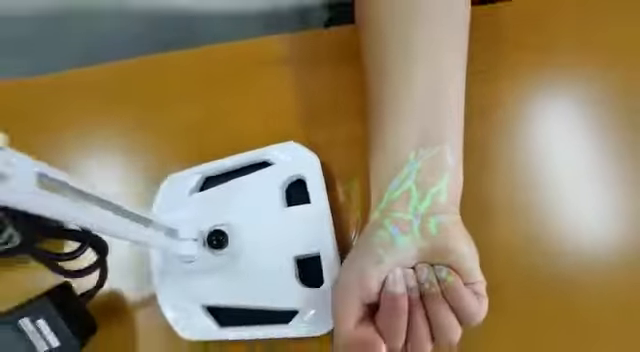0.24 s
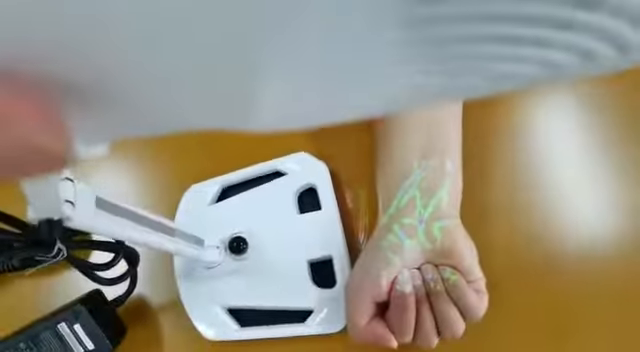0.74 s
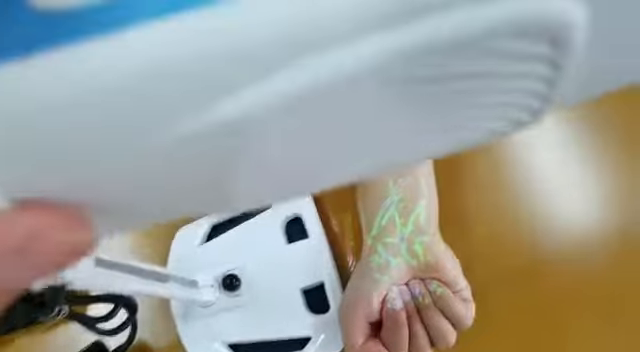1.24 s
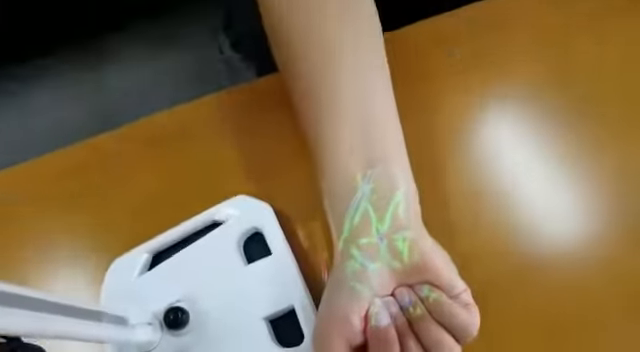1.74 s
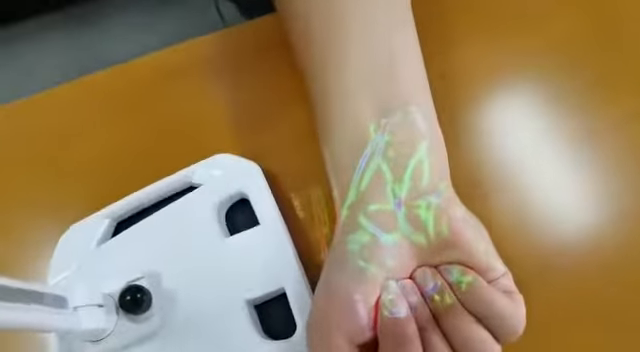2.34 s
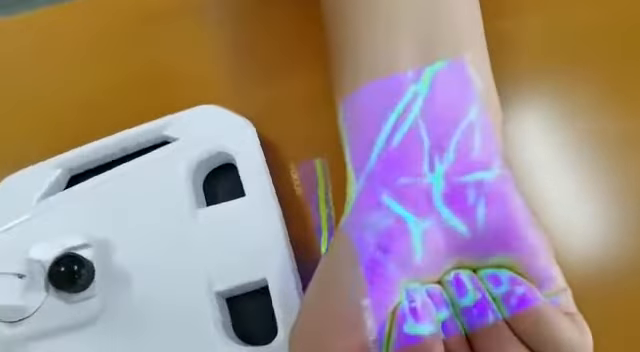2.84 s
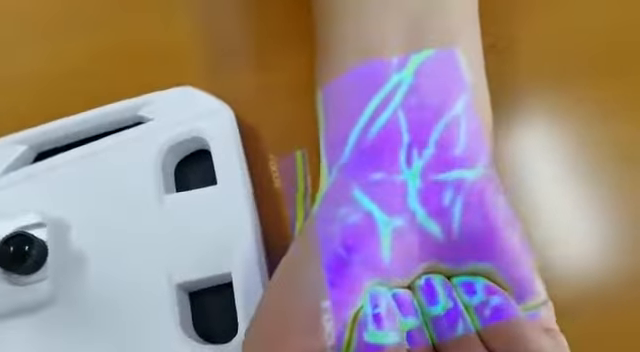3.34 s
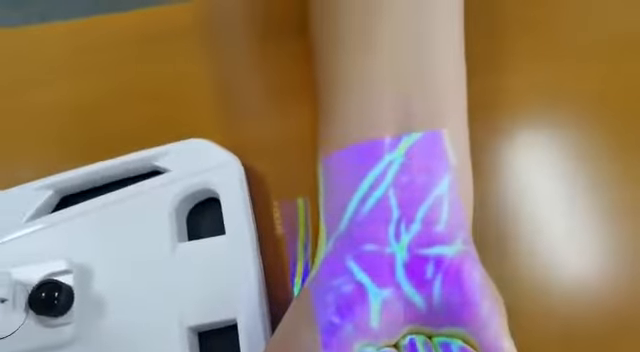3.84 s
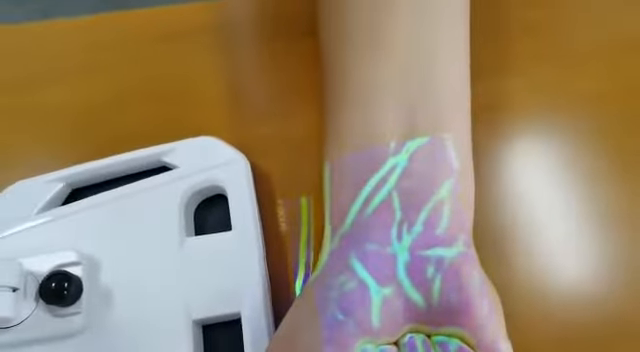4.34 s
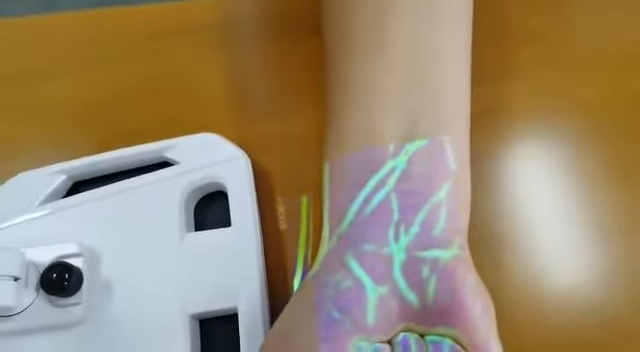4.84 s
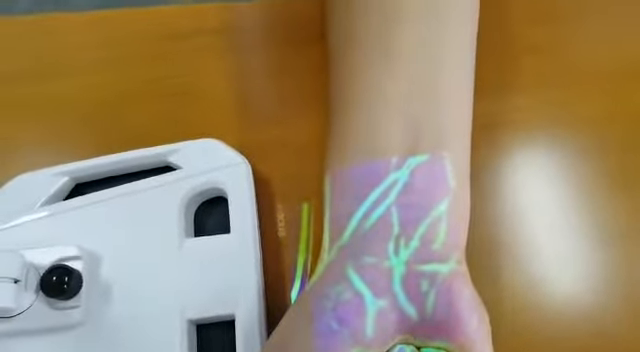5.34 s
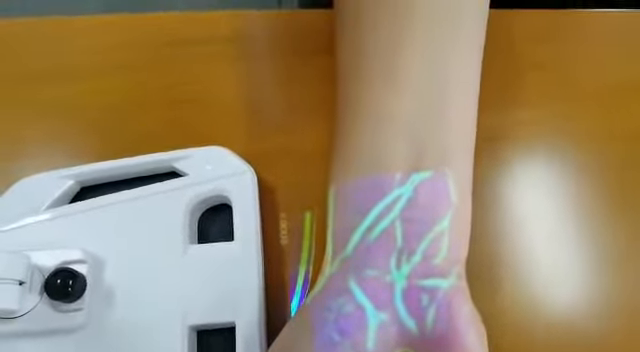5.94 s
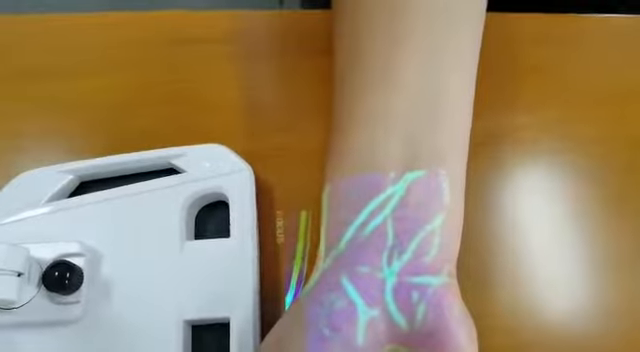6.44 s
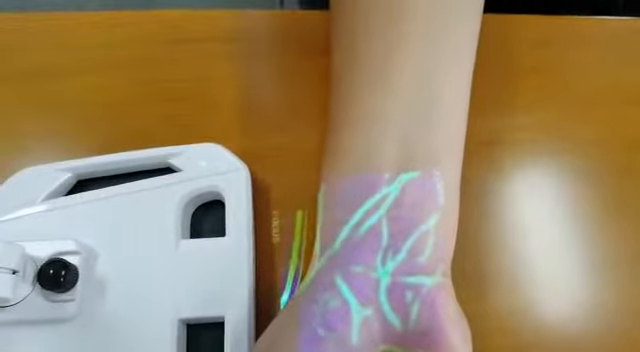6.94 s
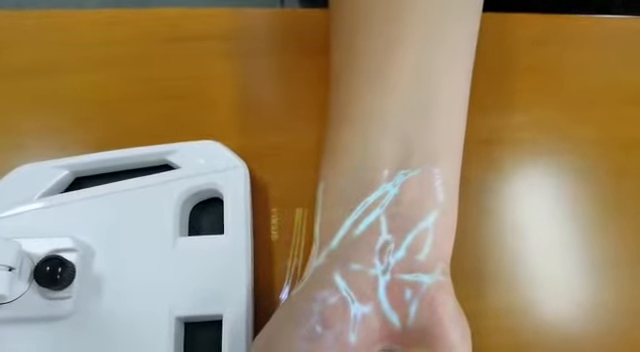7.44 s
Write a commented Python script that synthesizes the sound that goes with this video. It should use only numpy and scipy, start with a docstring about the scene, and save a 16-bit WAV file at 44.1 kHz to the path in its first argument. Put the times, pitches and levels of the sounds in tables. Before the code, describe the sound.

A steady low air hum with faint hiss fills a quiet room. After a few barely audible plastic ticks, a button snaps crisply and lets go with a soft knock; two stronger double clicks follow at intervals. Before the last one, a fingertip rubs lightly over the plastic grip. The clicks are close, dry and bright in stereo, with a brief hard-room tail.

```python
"""In a small hard room, with a low ventilation hum and a faint hiss behind, a scanner button is worked.
It is pressed and let go three times, close to the microphones: decaying sines ring for each stroke.
A press is a bright snap of the switch, a release a duller knock in the housing; noise tails are the room.
The plastic grip ticks in the hand, and a finger slides over it, as dense grains, before the last press.
The hum and hiss are shaped noise; single low tones swell in the hum and some of its bands waver."""
import sys
import numpy as np
from scipy import signal
from scipy.fft import rfft, irfft
from scipy.io import wavfile

SR = 44100
rng = np.random.default_rng(int(sys.argv[2]) if len(sys.argv) > 2 else 0)


def master_out(mix):
    """Clip the mix to full scale and print it as 16-bit PCM to the path in sys.argv[1]."""
    frames = np.transpose(np.atleast_2d(mix))
    ceiling = np.clip(frames, -1, 1)
    pcm = np.round(ceiling * 32767).astype(np.int16)
    wavfile.write(sys.argv[1], SR, pcm)


N = 339658
TIME = np.arange(N) / SR  # seconds
RING_SIZE = SR // 8       # samples for which a stroke rings

# likeness of the two sides of the noise: pitch_hz, correlation (-1 to 1)
SIDE_LIKENESS = [(60, 0.96), (280, 0.96), (640, 0.62), (1000, 0.38), (1500, -0.38), (2400, 0.07),
                 (4000, -0.044), (15000, 0.017)]
# relative colour of the ventilation rumble: pitch_hz, density_db (per Hz)
RUMBLE_COLOUR = [(15, -62), (25, 5), (37, -17), (53, -8), (91, -1), (118, -8.5), (139, -4), (195, -1.5),
                 (220, -3), (247, 0.5), (329, -11.5), (485, -13.5), (593, -19.5), (859, -23.5),
                 (1400, -24.5), (1820, -29.5), (3080, -120)]
# resonant drones in the ducts: centre_hz, width_hz, level_db
DUCT_DRONES = [(51.6, 15, -54), (201.4, 14, -54), (230, 52, -57.5), (847, 87, -64)]
# colour and level of the faint hiss: pitch_hz, density_db (per Hz)
HISS_COLOUR = [(700, -120), (1300, -94), (2300, -92), (2800, -98), (3250, -99), (3750, -105),
               (5000, -101.5), (6200, -100), (7200, -101.5), (8400, -97), (9200, -104), (10800, -109.5),
               (12000, -122), (16000, -124)]
# brief low swells of hum: start_s, end_s, pitch_hz, level_db
HUM_SWELLS = [(.75, 1.25, 148, -51), (.88, 1.06, 48.5, -49), (1.7, 1.87, 48.5, -48), (2.37, 2.8, 85, -46),
              (4.84, 5.06, 48, -47), (6.15, 6.32, 48, -48)]
# bands of the hum that sink or rise for a while: centre_s, width_s, low_hz, high_hz, change_db
HUM_WAVERS = [(.88, 0.83, 188, 282, -6), (2.14, 0.035, 170, 262, 4), (2.78, .1, 120, 400, 4.5),
              (3.4, 0.25, 238, 350, 2.5), (3.88, .14, 140, 200, 3)]
# metal dome of the switch and its seat: pitch_hz, left_db, right_db, t60_s
SWITCH_MODES = [(2850, -31, -32.5, 0.0091), (3320, -30.5, -31.7, 0.017), (3570, -33, -31.5, 0.019),
                (3867, -40, -35, 0.02), (4300, -34.5, -33, 0.0224), (4640, -32.6, -34, 0.022),
                (5205, -24.5, -21.5, 0.019), (5400, -25.5, -22, 0.011), (5800, -18.5, -19.5, 0.0094),
                (6084, -19, -18, 0.012), (6220, -23, -25, 0.016), (6580, -27, -23, 0.027),
                (7000, -25, -21.5, 0.011), (7349, -26, -21, 0.0094), (7600, -28, -26, 0.017),
                (8140, -18.5, -21.5, 0.0069), (8440, -25.3, -19.5, 0.012), (8780, -31, -25, 0.011),
                (9820, -34, -32.5, 0.012), (10024, -34.5, -41, 0.0106), (10840, -41.5, -47, 0.0093),
                (12750, -47, -43.0, 0.008)]
# ticks of the plastic grip under the fingers: start_s, level_db
GRIP_TICKS = [(1.3517, -38), (1.4206, -37), (1.5326, -40)]
# the button is pressed: start_s, snap_db, snap_pan_db (left over right), seat_gap_s (dome to seat),
# seat_db, seat_pan_db (left over right), panel_db, right_lag_s, tilt_db (per octave),
# push_db (into room and housing)
PRESSES = [(2.5186, 1, -1.5, 0.00034, -10, -7, -7, 0.00024, 1.5, -3),
           (4.1663, 5.5, 2.5, 0.000798, -4.5, 3, -4.5, 0.000253, -0.8, -2),
           (6.9655, 6.5, 3, 0.000897, -1.5, -10, -3.9, 0.000562, 2.5, -2)]
# the button is let go: the same columns, the seat contact being a light rebound
RELEASES = [(2.85672, -18.5, -.3, 0.0005, -36, -1.4, -29, 0.000306, -2.5, -31),
            (4.4363, -14.5, .4, .000473, -24, -2, -12.7, 0.00026, -1, -25),
            (7.18768, -16, -.8, .000271, -16, -1.8, -10.8, 0.00038, -1, -29)]
# faint early copies of the snap, just ahead of each stroke: ahead_s, lead_in_db (against the snap)
LEAD_INS = [(0.0032, -17), (0.00131, -15)]
# panel that carries the switch: pitch_hz, level_db, t60_s
PANEL_MODES = [(2230, -17.5, 0.039), (2293, -16, 0.028)]
# the freed cap knocks on its stop: start_s, level_db
CAP_KNOCKS = [(2.8575, 2.5), (2.8795, -10), (4.4365, 5.5), (7.1877, 5)]
# hollow plastic housing: pitch_hz, level_db, t60_s
HOUSING_MODES = [(490, -54, .05), (559, -50.5, 0.11), (691, -50.5, 0.068), (864, -42, 0.064),
                 (1148, -40.5, 0.068), (1295, -35.5, 0.023), (1785, -32, 0.014)]
# relative colour of the clicks as the room returns them: pitch_hz, level_db
ROOM_COLOUR = [(400, -25), (900, -15), (1400, -17), (1620, -12), (1790, -5.5), (1980, -9), (2300, 4.5),
               (2520, -3), (3170, -2), (3900, -7), (4400, -4), (4850, -3.5), (5400, 3.3), (6200, 3.8),
               (7000, 2.7), (8400, -.5), (9100, -9.5), (11100, -17), (11800, -33), (15000, -42)]
# a fingertip slides over the grip towards the button: time_s, level_db
SLIDE_LEVEL = [(5.7, -85), (5.98, -64.5), (6.2, -64), (6.3, -62), (6.45, -58.5), (6.53, -61.5), (6.62, -60),
               (6.78, -64), (6.9, -85)]
# what the rubbed grip rings with: pitch_hz, level_db, t60_s
GRIP_MODES = [(1800, -13, .015), (2250, -1, 0.014), (3110, -6.5, 0.017), (3630, -10.5, 0.016),
              (4900, -12, .015), (5300, -11, .015), (5800, -13, .015), (6280, -10, 0.017)]


def from_db(db):
    """Decibels to gain."""
    return 10 ** (np.asarray(db) / 20)


def rms_one(x):
    """Scale to an rms of 1."""
    return x / np.sqrt(np.mean(x ** 2) + 1e-20)


def at_hz(points, size=N):
    """Read a table over log frequency at the bins of a spectrum."""
    hz, value = np.transpose(points)
    bins_hz = np.fft.rfftfreq(size, 1 / SR) + 1e-9  # keeps the log finite at zero
    return np.interp(np.log(bins_hz), np.log(hz), value)


def low_pass(x, order, cutoff_hz):
    """Roll off the top above the cutoff."""
    return signal.sosfilt(signal.butter(order, cutoff_hz, fs=SR, output="sos"), x)


def diffuse_noise(gain):
    """Stereo noise of the given density per root Hz, mixed from mid and side to the table of likeness."""
    mid, side = rfft(rng.standard_normal((2, N))) * np.sqrt(SR / 4)
    alike = np.clip(at_hz(SIDE_LIKENESS), -1, 1)
    common = np.sqrt(1 + alike) * mid
    opposite = np.sqrt(1 - alike) * side * [[1], [-1]]
    return irfft(gain * (common + opposite), N)


def ventilation(rumble_db):
    """Air rumbles in the ducts and excites a few narrow resonances."""
    hz = np.fft.rfftfreq(N, 1 / SR)
    rumble = from_db(rumble_db) * rms_one(diffuse_noise(from_db(at_hz(RUMBLE_COLOUR))))
    drone_power = 0
    for centre_hz, width_hz, db in DUCT_DRONES:
        peak = 1 / (1 + ((hz - centre_hz) / width_hz) ** 2) ** 2
        drone_power = drone_power + from_db(db) ** 2 * peak / (np.sum(peak) * SR / N)
    return rumble + diffuse_noise(np.sqrt(drone_power))


def hum_wavers(hum):
    """Bands of the hum sink or rise and come back along bell curves."""
    out = hum
    for centre_s, width_s, low_hz, high_hz, db in HUM_WAVERS:
        band_pass = signal.butter(3, [low_hz, high_hz], "band", fs=SR, output="sos")
        band = signal.sosfiltfilt(band_pass, hum)
        bell = np.exp(-((TIME - centre_s) / width_s) ** 2)
        out = out + band * (from_db(db * bell) - 1)
    return out


def hiss():
    """A faint, steady wash of shaped noise."""
    return diffuse_noise(from_db(at_hz(HISS_COLOUR)))


def hum_swells(fade_s):
    """Now and then one low sine rises out of the rumble and sinks back."""
    out = 0
    for start_s, end_s, hz, db in HUM_SWELLS:
        fade = np.clip(np.minimum(TIME - start_s, end_s - TIME) / fade_s, 0, 1)
        tone = np.sqrt(2) * np.sin(2 * np.pi * (hz * TIME + rng.random()))
        out = out + from_db(db) * fade * tone
    return out


def ring(modes, tilt_db=0, after_s=0):
    """Each mode rings as a dying sine; neighbours swing in opposite senses, so close pairs swell and beat."""
    t = np.maximum(TIME[:RING_SIZE] - after_s, 0)  # silent until after_s
    out = 0
    for k, (hz, db, t60) in enumerate(modes):
        bright_db = tilt_db * np.log2(hz / 6000)  # the tilt pivots at 6 kHz
        decay = from_db(db + bright_db - 60 * t / t60)
        out = out + (-1) ** k * decay * np.sin(2 * np.pi * hz * t)
    return out


def contact(db, pan_db, lag_s, tilt_db, after_s):
    """One contact of the dome as both microphones hear it, the right one later by lag_s."""
    left = [(hz, left_db, t60) for hz, left_db, _, t60 in SWITCH_MODES]
    right = [(hz, right_db, t60) for hz, _, right_db, t60 in SWITCH_MODES]
    return np.array([from_db(db + pan_db / 2) * ring(left, tilt_db, after_s),
                     from_db(db - pan_db / 2) * ring(right, tilt_db, after_s + lag_s)])


def grip_ticks():
    """Tiny slips in the plastic shake the switch faintly."""
    out = np.zeros((2, N))
    for start_s, db in GRIP_TICKS:
        at = round(start_s * SR)
        out[:, at:at + RING_SIZE] += contact(db, pan_db=-2, lag_s=0, tilt_db=0, after_s=0)
    return out


def clicks(rows):
    """A stereo train of single-sample pushes from rows of start_s, level_db."""
    out = np.zeros((2, N))
    for start_s, db in rows:
        out[:, round(start_s * SR)] += from_db(db)
    return out


def switch_strokes(rows):
    """The dome snaps, faintly led in, and meets its seat after a gap that colours it; the panel rings along."""
    out = np.zeros((2, N))
    panel = np.array([ring(PANEL_MODES), ring(PANEL_MODES, after_s=.00031)])
    for start_s, snap_db, pan_db, gap_s, seat_db, seat_pan_db, panel_db, lag_s, tilt_db, _ in rows:
        snap = contact(snap_db, pan_db, lag_s, tilt_db, after_s=0)
        seat = contact(seat_db, seat_pan_db, lag_s, tilt_db, after_s=gap_s)
        at = round(start_s * SR)
        out[:, at:at + RING_SIZE] += snap + seat + from_db(panel_db) * panel
        for ahead_s, lead_in_db in LEAD_INS:
            varied_s = ahead_s * rng.uniform(.85, 1.15)  # the timing of each lead-in varies
            at = round((start_s - varied_s) * SR)
            out[:, at:at + RING_SIZE] += from_db(lead_in_db) * snap
    return out


def near_echoes(x, level_db, t60):
    """Hand and housing scatter each click for a few milliseconds, differently on each side."""
    t = TIME[:SR // 20]
    scatter = rng.standard_normal((2, len(t))) * from_db(-60 * t / t60)
    scatter /= np.sqrt(np.sum(scatter ** 2, axis=1, keepdims=True))
    return x + from_db(level_db) * signal.oaconvolve(x, scatter, axes=1)[:, :N]


def room(force, level_db, t60, low_t60, first_s, full_s):
    """Wall echoes build up after a short gap and die away, the lows at their own pace."""
    t = TIME[:SR]
    noise = rfft(rng.standard_normal((2, SR)))
    echoes = irfft(noise * from_db(at_hz(ROOM_COLOUR, size=SR)), SR)
    low = signal.sosfiltfilt(signal.butter(2, 1600, fs=SR, output="sos"), echoes)
    build_up = np.clip((t - first_s) / (full_s - first_s), 0, 1)
    tail = 0
    for band, decay_s in ((low, low_t60), (echoes - low, t60)):
        shape = build_up * from_db(-60 * t / decay_s)
        tail = tail + band * shape / np.sqrt(np.sum(shape ** 2))
    return from_db(level_db) * signal.oaconvolve(force, tail, axes=1)[:, :N]


def button(snap_housing_db, knock_room_db):
    """Strokes ring the switch and panel, snaps and cap knocks ring the housing, and the room answers."""
    strokes = PRESSES + RELEASES
    snaps = clicks([(start_s, push_db) for start_s, *_, push_db in strokes])
    # the tiny offset keeps the filter clear of denormal numbers
    knocks = low_pass(clicks(CAP_KNOCKS) + 1e-18, order=3, cutoff_hz=1140)
    switch = switch_strokes(strokes)
    # the wide shell of the housing reaches both sides at once
    shell_force = knocks + from_db(snap_housing_db) * snaps
    housing = signal.oaconvolve(shell_force, ring(HOUSING_MODES)[None], axes=1)[:, :N]
    direct = low_pass(switch + housing, order=6, cutoff_hz=13000)
    room_force = snaps + from_db(knock_room_db) * knocks
    answer = room(room_force, level_db=2.0, t60=0.63, low_t60=0.85, first_s=0.0009, full_s=0.036)
    return near_echoes(direct, level_db=-12, t60=.016) + answer


def finger_slide(slips_per_s, uneven_db):
    """Skin catches and slips in dense uneven grains that ring the grip."""
    sizes = from_db(uneven_db * np.minimum(rng.exponential(1, N), 4))
    slips = (rng.random(N) < slips_per_s / SR) * sizes * rng.standard_normal((2, N))
    rub = rms_one(signal.oaconvolve(slips, ring(GRIP_MODES)[None], axes=1)[:, :N])
    time_s, db = np.transpose(SLIDE_LEVEL)
    return rub * np.interp(TIME, time_s, from_db(db), left=0, right=0)


def scene():
    """Hum and hiss behind, the button and the hand in front."""
    behind = hum_wavers(ventilation(rumble_db=-45.5)) + hiss() + hum_swells(fade_s=0.024)
    hand = grip_ticks() + finger_slide(slips_per_s=2500, uneven_db=2)
    return behind + hand + button(snap_housing_db=-3.5, knock_room_db=-3.5)


def record(dry):
    """The microphones lose the deepest bass; the top is cut steeply."""
    thin = signal.sosfilt(signal.butter(6, 37, "high", fs=SR, output="sos"), dry)
    # 0.1 dB ripple, 80 dB down above the 15.8 kHz edge
    return signal.sosfilt(signal.ellip(10, .1, 80, 15800, fs=SR, output="sos"), thin)


dry = scene()
out = record(dry)
master_out(out)
```